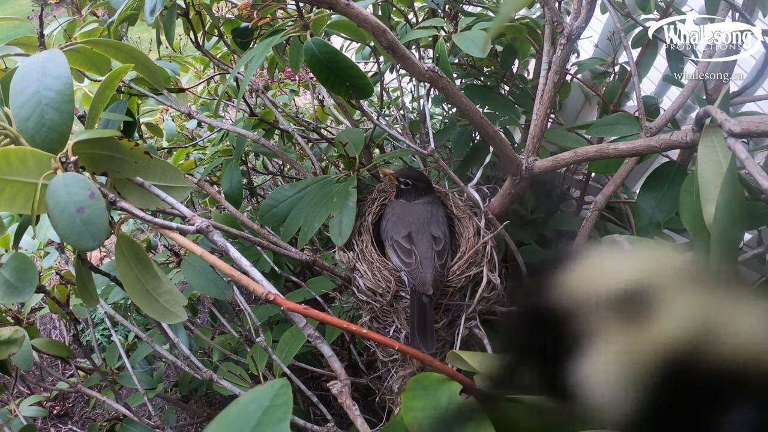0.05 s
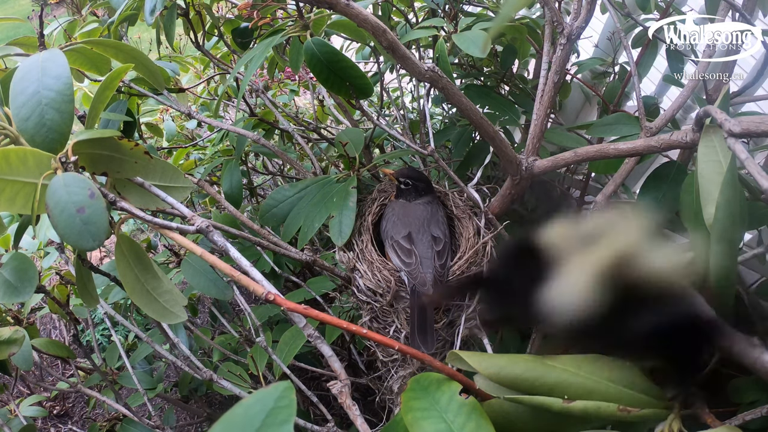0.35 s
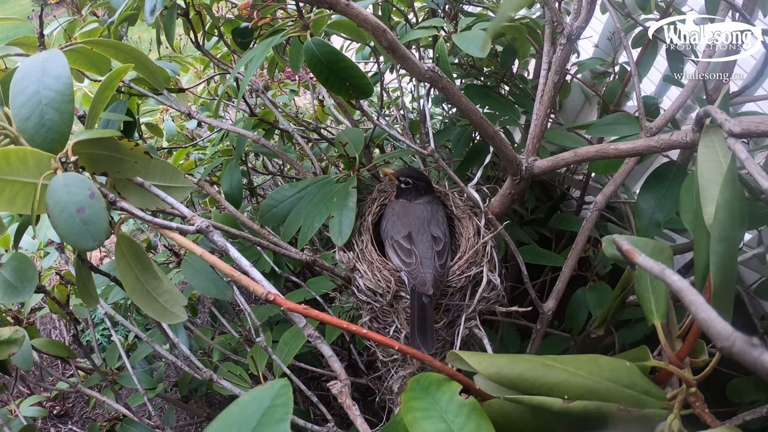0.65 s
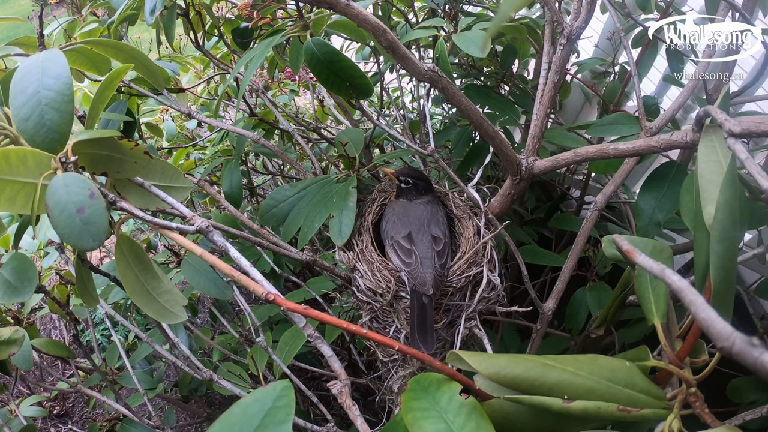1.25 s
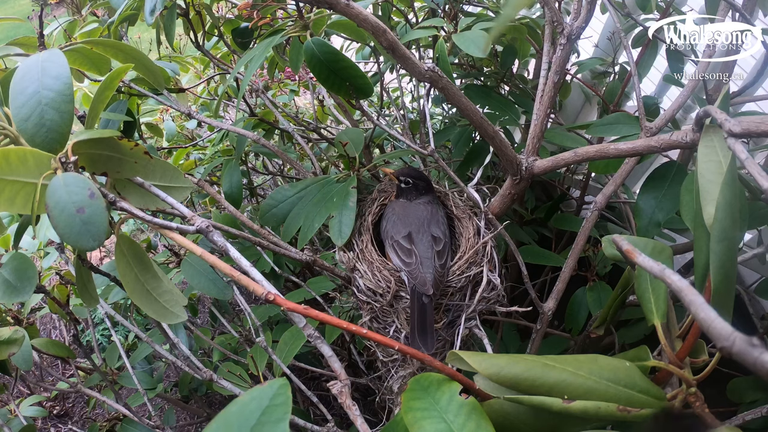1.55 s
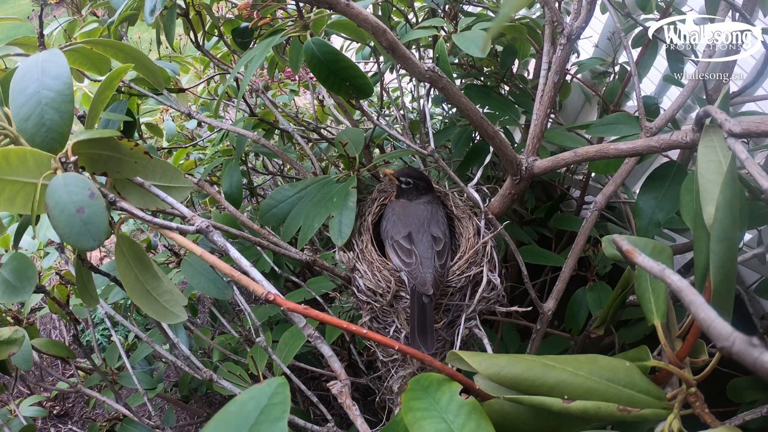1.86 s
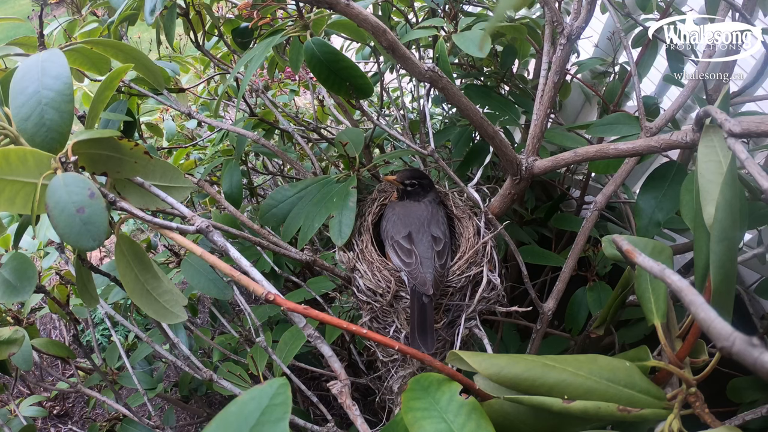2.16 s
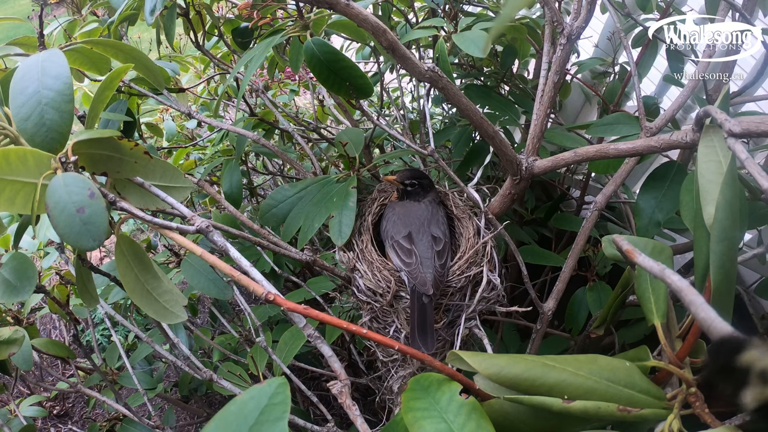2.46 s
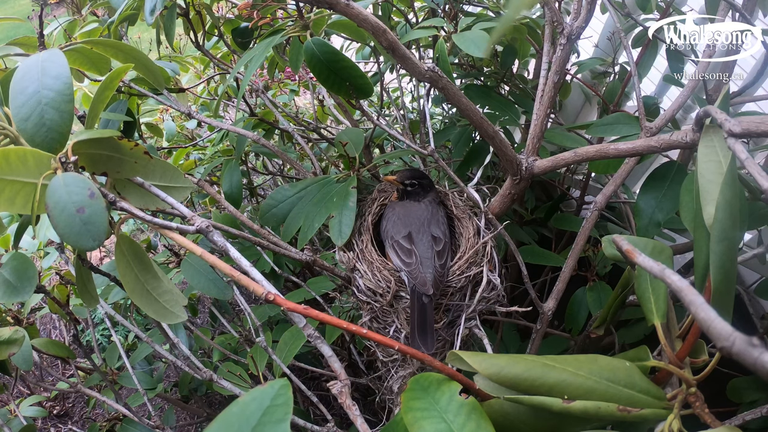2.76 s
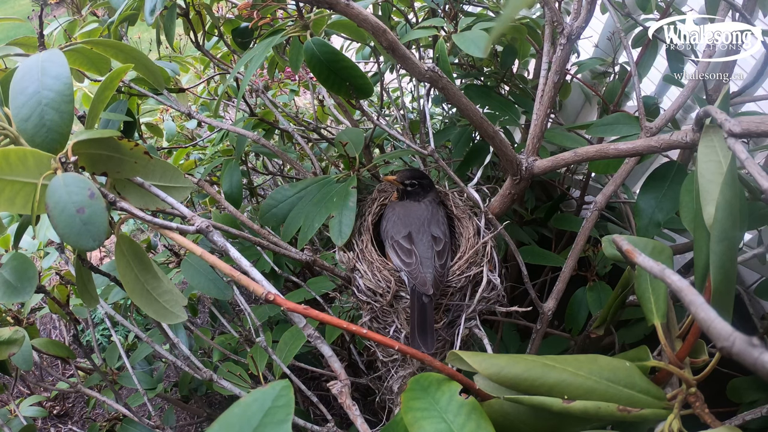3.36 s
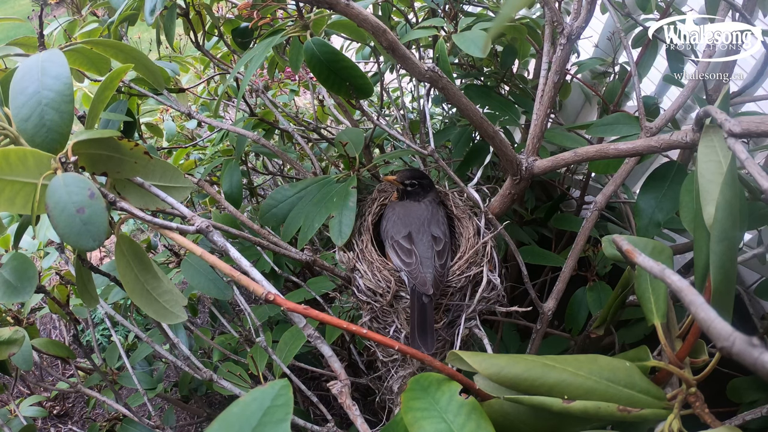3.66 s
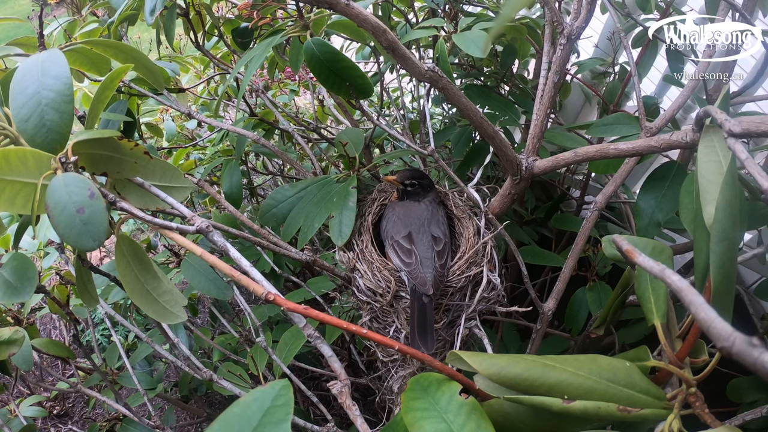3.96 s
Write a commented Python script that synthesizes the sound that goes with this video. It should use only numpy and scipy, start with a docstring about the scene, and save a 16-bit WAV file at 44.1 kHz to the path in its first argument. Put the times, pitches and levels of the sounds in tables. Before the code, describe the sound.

Close, low, raspy bumblebee buzz drifting from left to right with brief leaf scratches.

```python
"""A bumblebee hovers close by in a garden shrub, starting on the left over a faint outdoor hush.
Its periodic wing strokes hum, and each turn of the wings adds a raspy snap and a puff of hiss.
Soon the first gusts of wing draught rumble and the wing tips rattle against a leaf. Near 1 s the
bee crosses to the right, where it stays, with more gusts and brushes. Towards 4 s the brushes
come closer together and a twig rings with two small knocks."""
import sys
import numpy as np
from scipy import signal
from scipy.fft import rfft, irfft
from scipy.io import wavfile

SR = 44100
rng = np.random.default_rng(int(sys.argv[2]) if len(sys.argv) > 2 else 0)


def put_to_file(sound):
    """Save the sound as 16-bit audio at rate SR, in the file named by the first command-line argument."""
    columns = np.atleast_2d(sound).T  # one column per channel
    safe = np.clip(columns, -1, 1)
    whole_steps = np.round(safe * 32767)
    wavfile.write(sys.argv[1], SR, whole_steps.astype(np.int16))


N = 176400
TIME = np.arange(N) / SR
LOW_CORRELATION, HISS_CORRELATION = 0.63, 0.11  # between the left and right noise


# wingbeat frequency: t/s, f/Hz
WINGBEAT_RATE = [(0.0, 138.8), (0.16, 146.7), (0.24, 141.1), (0.38, 146.1), (0.56, 138.2), (0.68, 149.7),
                 (0.78, 143.9), (0.84, 145.8), (0.88, 138.2), (1.06, 147.2), (1.12, 142.8), (1.32, 135.8),
                 (1.38, 143.8), (1.48, 133.2), (1.56, 144.1), (1.72, 146.2), (1.82, 136.9), (2.3, 146.7),
                 (2.34, 140.5), (2.44, 140), (2.56, 145.8), (2.72, 138.9), (2.8, 129.4), (2.86, 141.9),
                 (2.92, 139.0), (3.04, 146.8), (3.08, 142.9), (3.14, 147.9), (3.26, 137.9), (3.34, 149.3),
                 (3.5, 142.8), (3.52, 133.2), (3.56, 140.6), (3.58, 135.7), (3.66, 147.9), (3.88, 148.8),
                 (3.92, 142.4), (3.99, 145.8)]
def wing_phase(jitter=0.00199):
    """Phase is the integral of frequency: one cycle per slightly irregular wingbeat."""
    rate, = in_time(WINGBEAT_RATE)
    return 2 * np.pi * np.cumsum(rate * (1 + jitter * drift(45.4))) / SR


# first, second and fourth harmonics of the hum: t/s, level/dB
FIRST_HARMONIC = [(.19,-24.5),(.23,-31.5),(.3,-24),(.44,-31.5),(.54,-20.5),(.59,-26),(.68,-25),(1.05,-32.5),(1.09,-37),(1.18,-34),(1.5,-24.5),(1.68,-28),
                  (2.07,-21.5),(2.17,-26.5),(2.32,-23.5),(2.38,-34),(2.5,-29.5),(2.63,-33.5),(2.91,-22),(3,-28),(3.42,-28.5),(3.47,-37.5),(3.65,-31.5),(4,-33.5)]
SECOND_HARMONIC = [(0,-21.5),(.2,-21),(.35,-23.5),(.56,-19.5),(.68,-22),(1,-29.5),(1.2,-30),(1.52,-21.5),(1.68,-24),(2.04,-17.5),(2.3,-20.5),(2.62,-27),(2.87,-19.5),(3.1,-25),(3.43,-23.5),(3.52,-27),(3.65,-23.5),(3.95,-28.5)]
FOURTH_HARMONIC = [(.17,-40),(.23,-44),(.35,-38.5),(.75,-40.5),(.88,-48),(1.1,-44.5),(1.55,-44.5),(1.62,-37.5),(1.8,-42),(2.03,-39),(2.13,-42),(2.27,-34.5),
                   (2.4,-50.5),(2.52,-39),(2.76,-43),(2.87,-40),(2.95,-43),(3.05,-40),(3.28,-46),(3.38,-42),(3.57,-56),(3.66,-40.5),(3.75,-46)]
# the buzz hardens and softens as the bee turns: t/s, third harmonic level/dB, rasp level/dB
HARDNESS = [(0,-36.5,-29.5),(.08,-44,-35),(0.232,-31,-34.5),(0.401,-45.5,-44.5),(.53,-32,-30),(0.622,-29.5,-28),(0.732,-53,-44.5),(.88,-40.5,-38.5),(1.031,-45,-46),(1.09,-53,-48.5),
            (1.14,-45.5,-49),(1.521,-33,-31.5),(1.72,-46,-38.5),(1.77,-34.5,-34),(1.9,-30.5,-28.5),(2.101,-30.5,-28),(2.291,-41.5,-36),(2.339,-33.5,-31.5),(2.479,-33.5,-35),
            (2.59,-51,-39),(2.7,-36.5,-39),(2.932,-33.5,-31.5),(3.169,-48,-42.5),(3.24,-37.5,-35),(3.52,-42,-42),(3.659,-35,-32.5),(3.88,-48.5,-44.5),(3.96,-45,-39.5)]
# the bee's position as left relative to right, and a phase lead of the rasp on the left: t/s, hum pan/dB, rasp
# pan/dB, rasp phase lead/rad
POSITION = [(0,9.5,5,4),(.6,7.5,3.5,-2.5),(.8,1.5,1,2),(1.05,-3,-4.5,0.5),(1.5,-8,-7,2.1),(2,-12,-6.5,3),(2.6,-12,-10.5,3.5),(3.6,-22,-7,4),(4,-18.5,-5,3.5)]
def hum(phase, push_cycles=0.29, waver_db=1.5):
    """Fourier series: the stroke's periodic push radiates four harmonics; the odd ones waver."""
    push = phase - 2 * np.pi * push_cycles
    out = 0
    for k, curve in enumerate((FIRST_HARMONIC, SECOND_HARMONIC, HARDNESS, FOURTH_HARMONIC), 1):
        db = in_time(curve)[0] + waver_db * drift(21.5) * (k % 2)
        out = out - from_db(db) * np.cos(k * push)
    return out * panned(in_time(POSITION)[0])


# spectral envelope of the wing snap: harmonic number, relative level/dB
SNAP_SPECTRUM = [(5,-7.5),(6,-2.5),(7,-10),(8,-11),(9,-22.5),(10,-23),(11,-22.5),(12,-13.5),(13,-17.5),(15,-21.5),(20,-27.5),(23,-32.5),(38,-36),(60,-66)]
def rasp(phase, flicker_db=1.5, wander_rad=0.67, brightening=0.51):
    """A pulse train has a line spectrum: one snap per beat gives harmonics 5 to 60."""
    _, pan, lead = in_time(POSITION)
    envelope_db = np.interp(np.arange(61), *np.transpose(SNAP_SPECTRUM))
    # minimum phase, the Hilbert transform of the log magnitude, makes the snap causal
    mirrored_db = np.r_[envelope_db, envelope_db[-2:0:-1]]
    lag = signal.hilbert(np.log(from_db(mirrored_db))).imag
    middle, treble = 0, 0
    for k in range(5, 61):
        db = envelope_db[k] + flicker_db * drift(12)
        if k > 17:  # brighter while the bee is on the left
            db = db + brightening * (pan - pan.mean())
        partial = from_db(db) * np.exp(1j * (k * phase - lag[k] + wander_rad * drift(13)))
        if k < 8:
            middle = middle + partial
        else:
            treble = treble + partial
    left_lead = 1j * lead * [[1], [0]]
    middle = from_db(in_time(HARDNESS)[1]) * middle * panned(pan) * np.exp(left_lead)
    treble = from_db(treble_db()) * treble * panned(0.45 * pan) * np.exp(0.56 * left_lead)
    return (middle + treble).real


def treble_db(share=0.56):
    """Compressed range: the treble follows only a share of the rasp's swing in level."""
    rasp_db = in_time(HARDNESS)[1]
    return rasp_db.mean() + share * (rasp_db - rasp_db.mean())


def buzz(phase, flutter_rad=0.056, shimmer_db=1):
    """Modulation: hum and rasp tremble together in amplitude, and each gust shakes their phase."""
    gusts = sum(swell(t, half_width) for t, half_width, _ in GUSTS)
    phase = phase + flutter_rad * gusts * drift(110)
    return np.sqrt(2) * from_db(shimmer_db * drift(18)) * (hum(phase) + rasp(phase))


# wing hiss relative to the rasp's treble: t/s, level/dB
HISS_LEVEL = [(0,-13.5),(.3,-7),(.55,-10.5),(.92,-7),(1.3,-10.5),(1.9,-11),(2.8,-11),(3.5,-7),(3.9,-7.5)]
# spectral density of the hiss: f/Hz, relative level/dB
HISS_SPECTRUM = [(300,15),(1400,7),(2100,2.5),(3200,-0.5),(5400,0),(6500,-1),(9400,-1.5),(11000,-12),(15000,-22)]
def wing_hiss(phase):
    """Turbulence: air torn by the wings gives broadband noise, strongest at each snap."""
    db = in_time(HISS_LEVEL)[0] + treble_db()
    pan = 0.32 * in_time(POSITION)[0]
    pulses = beat_gate(phase, sharpness=6.6, floor=0.38)
    return from_db(db) * pulses * panned(pan) * noise(HISS_SPECTRUM, HISS_CORRELATION)


# wing tips on a leaf: t/s, half-width/s, level/dB, pan/dB, relative ring level/dB, ring f/Hz
LEAF_CONTACTS = [(.561,0.012,-46.5,-3,9.5,4000),(.603,0.0077,-53.5,3,15,4570),(.628,.017,-44,-4,4.5,5060),(.659,0.0037,-48,-3,16.5,2120),
                 (.826,0.01,-39,-4,-17,3700),(.863,0.0057,-42,-8,-17,2991),(.895,0.0063,-42,-9,-25,3000),
                 (1.515,0.0087,-38.5,-8,0,1706),(2.069,0.0039,-38.5,-3,6.5,1800),(2.372,0.02,-48,-9,-23,2010),
                 (2.896,0.0049,-44.5,-5,3,1400),(3.001,0.024,-45.5,-15,1,1770),(3.278,.016,-40,-8,3.5,2230),
                 (3.412,0.014,-41.5,-8,-1,1691),(3.446,0.0033,-43.5,-10,4.5,3220),
                 (3.61,0.013,-43.5,-10,-0.5,2800),(3.661,0.021,-37,-5.5,-3.5,1950),(3.736,.024,-45.5,-15,-0.5,2206)]
# spectral density of the scratch: f/Hz, relative level/dB
SCRATCH_SPECTRUM = [(1500,-21.5),(3000,-3),(6000,0),(8000,2.5),(9600,1.5),(11000,-17),(15000,-25.5)]
def leaf_brushes(phase, leaf_q=3.3, flicker_db=1.2):
    """Forced resonance: while a wing tip touches, each beat's scratchy tick rings the leaf."""
    scratch = noise(SCRATCH_SPECTRUM, HISS_CORRELATION)
    white = rng.standard_normal((2, N))
    out = 0
    for t, half_width, db, pan, ring_db, ring_hz in LEAF_CONTACTS:
        omega = 2 * np.pi * ring_hz / SR
        radius = np.exp(-omega / (2 * leaf_q))
        ring = signal.lfilter([1], [1, -2 * radius * np.cos(omega), radius * radius], white)
        ring = from_db(ring_db) * ring / ring.std()
        contact_phase = phase - np.interp(t, TIME, phase)
        ticks = swell(t, half_width) * beat_gate(contact_phase, sharpness=10.0, floor=0.15)
        out = out + from_db(db) * ticks * panned(pan) * (scratch + ring)
    return out * from_db(flicker_db * drift(77))


# small knocks on a twig: t/s, level/dB
TWIG_KNOCKS = [(3.426,-36.5),(3.661,-34.5)]
def twig_knocks(ring_hz=1306, decay_s=0.01):
    """Damped free vibration: each knock excites one mode of the twig, which decays exponentially."""
    out = 0
    for t, db in TWIG_KNOCKS:
        age = np.maximum(TIME - t, 0)
        out = out + from_db(db) * np.exp(-age / decay_s) * np.sin(2 * np.pi * ring_hz * age)
    return out


# gusts of wing draught: t/s, half-width/s, level/dB
GUSTS = [(0.22,0.025,-40),(.585,0.049,-39),(1.484,0.043,-35),(2.386,.035,-39.5),(2.905,0.064,-39),(3.549,0.14,-41)]
# spectral density of the draught: f/Hz, relative level/dB
DRAUGHT_SPECTRUM = [(55,-28),(120,18),(250,-2.5),(600,0),(2500,-48.5)]
def wing_draught():
    """Flow noise: the pressure of each gust fluctuates on the microphone as a soft rumble."""
    gusts = sum(from_db(db) * swell(t, half_width) for t, half_width, db in GUSTS)
    return gusts * panned(in_time(POSITION)[0]) * noise(DRAUGHT_SPECTRUM, LOW_CORRELATION)


# spectral density of the outdoor hush: f/Hz, relative level/dB
HUSH_SPECTRUM = [(35,-37.5),(57,12.5),(100,2.5),(250,-12),(600,-7.5),(1500,-11),(3500,-23.5),(15000,-49.5)]
def garden_hush(level_db=-50.5, pan_db=7):
    """Stationary noise: a faint, low ambient hush, stronger on the left."""
    return from_db(level_db) * panned(pan_db) * noise(HUSH_SPECTRUM, LOW_CORRELATION)


def from_db(db):
    """Amplitude ratio: a factor of ten per 20 dB."""
    return 10 ** (np.asarray(db) / 20)


def in_time(rows):
    """Linear interpolation of each column after t, per sample."""
    times, *columns = np.transpose(rows)
    return [np.interp(TIME, times, column) for column in columns]


def drift(corner_hz):
    """Low-pass filtered noise: a random wander of unit standard deviation."""
    step = 40  # samples between points
    pole = np.exp(-2 * np.pi * corner_hz * step / SR)
    white = rng.standard_normal(N // step + 2002)
    slow = signal.lfilter([1], [1, -2 * pole, pole * pole], white)[2000:]  # once settled
    return np.interp(np.arange(N) / step, np.arange(len(slow)), slow / slow.std())


def noise(spectrum, correlation):
    """Partial coherence: mid and side noise of one spectrum mix to stereo of rms 1."""
    hz, db = np.transpose(spectrum)
    gain = from_db(np.interp(np.log(np.fft.rfftfreq(N, 1 / SR) + 1), np.log(hz), db))
    mid, side = irfft(rfft(rng.standard_normal((2, N))) * gain, N)
    out = np.sqrt(1 + correlation) * mid + np.sqrt(1 - correlation) * side * [[1], [-1]]
    return out / out.std()


def panned(db):
    """Constant-power panning: two gains for a level difference, left minus right."""
    gains = from_db(np.atleast_1d(db) * [[.5], [-.5]])
    return gains / np.sqrt(np.mean(gains ** 2, axis=0))


def swell(t, half_width):
    """Gaussian envelope about t; the half-width is its standard deviation."""
    return np.exp(-((TIME - t) / half_width) ** 2 / 2)


def beat_gate(phase, sharpness, floor):
    """Pulse modulation: one short opening per wingbeat over a steady floor, rms 1."""
    gate = floor + (1 - floor) * np.exp(sharpness * (np.cos(phase) - 1))
    return gate / np.sqrt(np.mean(gate ** 2))


def scene():
    """Superposition of all sources; one wingbeat drives the buzz, the hiss and the brushing."""
    phase = wing_phase()
    bee = buzz(phase) + wing_hiss(phase) + leaf_brushes(phase)
    return bee + twig_knocks() + wing_draught() + garden_hush()


def record(dry):
    """Band limiting: rumble below 35 Hz and treble above 15.6 kHz are cut."""
    dry = signal.sosfilt(signal.butter(2, 35, "high", fs=SR, output="sos"), dry)
    return signal.sosfilt(signal.ellip(10, .1, 80, 15600, fs=SR, output="sos"), dry)


dry = scene()
out = record(dry)
put_to_file(out)
```